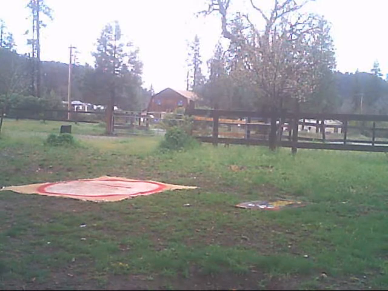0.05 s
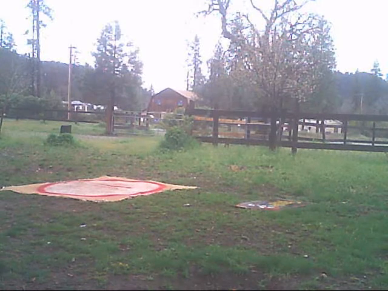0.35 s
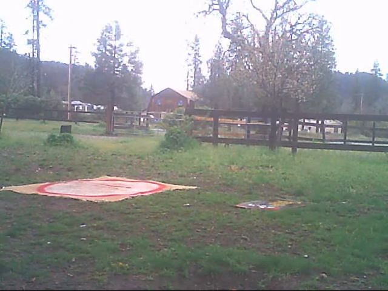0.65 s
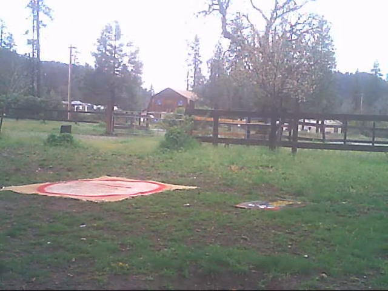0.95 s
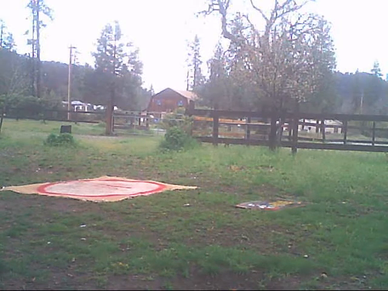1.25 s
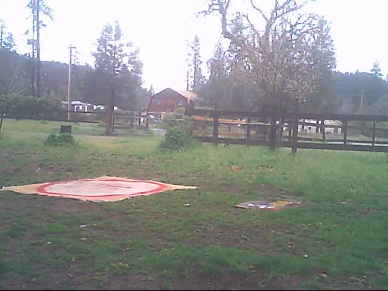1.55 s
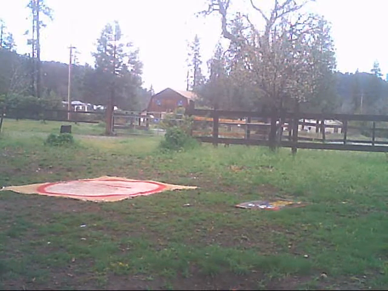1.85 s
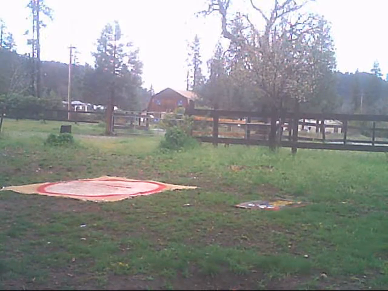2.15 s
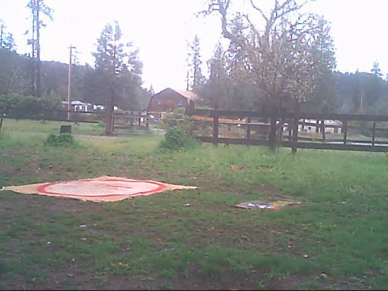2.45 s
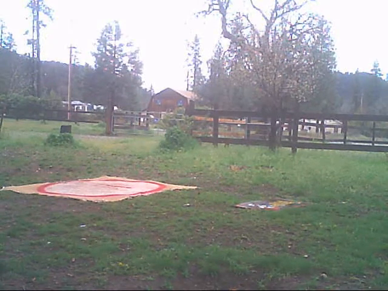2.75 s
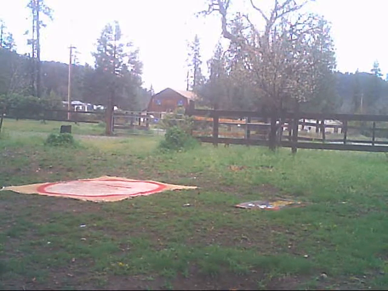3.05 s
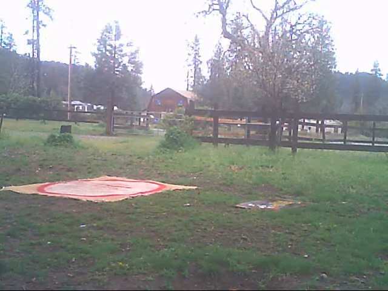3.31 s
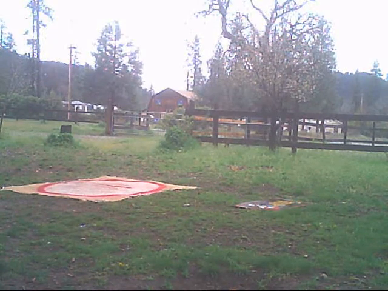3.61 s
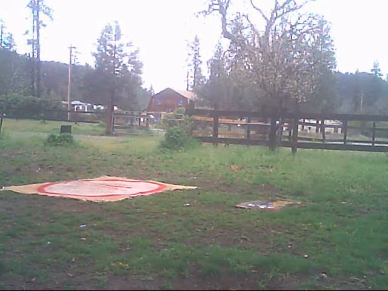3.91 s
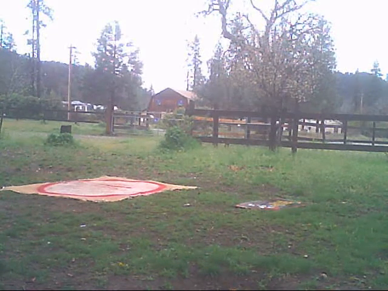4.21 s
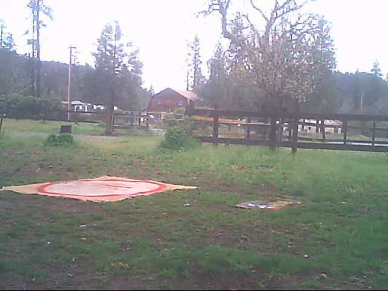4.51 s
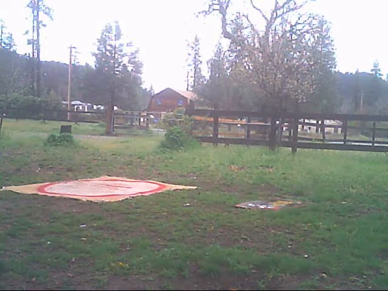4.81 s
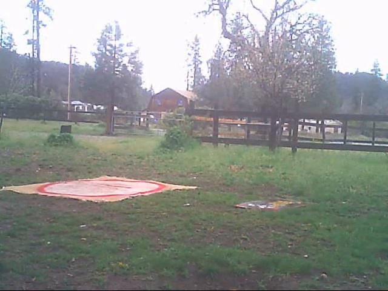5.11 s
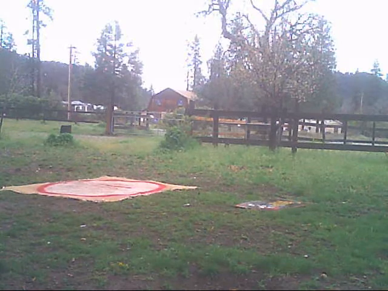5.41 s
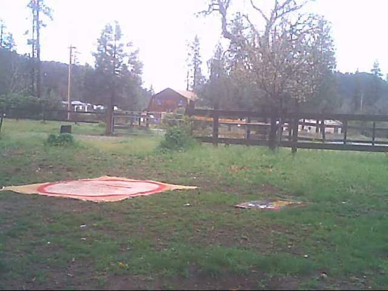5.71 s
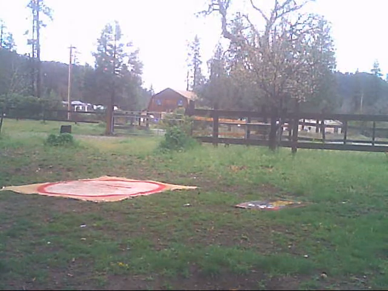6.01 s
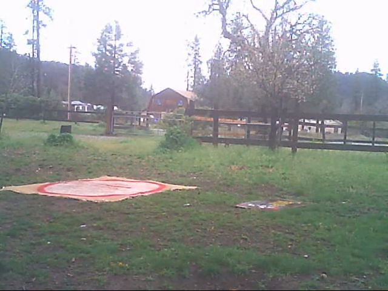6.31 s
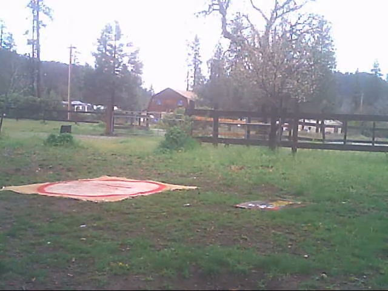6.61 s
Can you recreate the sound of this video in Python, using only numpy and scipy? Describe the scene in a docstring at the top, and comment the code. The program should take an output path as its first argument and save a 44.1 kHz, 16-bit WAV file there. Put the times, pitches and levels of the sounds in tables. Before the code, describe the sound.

The small engine of a model helicopter buzzes without a break outdoors, steady in speed and a little raspy. Its blades add a light flutter and a wash of air, and the engine stumbles slightly around two seconds in and again near five. The sound is mono and a bit fizzy, from a cheap microphone with some hiss and a light, low wind rumble.

```python
"""Model helicopter hovering over a field.

A small two-stroke glow engine holds a nearly steady speed. Running rich, it fires on every second
turn and now and then slips a beat; the main blades chop the exhaust note, throb and rush.
The tail rotor hums. Light wind bumps the microphone of a small camera with a coarse converter."""
import sys
import numpy as np
from scipy import signal
from scipy.fft import rfft, irfft, next_fast_len
from scipy.io import wavfile
from scipy.ndimage import map_coordinates

SR = 44100
rng = np.random.default_rng(int(sys.argv[2]) if len(sys.argv) > 2 else 0)


def unload_wav(signal):
    """Save mono or channel-first audio to the path in sys.argv[1] as 16-bit WAV at rate SR, clipped to [-1, 1]."""
    wavfile.write(
        sys.argv[1],
        SR,
        np.round(np.clip(np.atleast_2d(signal).T, -1, 1) * 32767).astype(np.int16),
    )


N = 293706

# camera hiss: freq_hz, density_db
HISS_SPECTRUM = [(100, 11), (3000, -1.5), (5000, -0.5), (8000, -3), (15000, -6)]
# camera whine: pitch_hz, level_db
WHINE_TONES = [(5669, -82), (8441, -69), (10002, -77), (14427, -83)]
# wind on the microphone: time_s, level_db
WIND_LEVEL = [(0.22, -42), (0.8, -57.5), (1.3, -52), (2.9, -48), (3.2, -57), (4.1, -56), (4.7, -45.5),
              (5.2, -55), (5.85, -46.5), (6.6, -53.5)]
# wind rumble: freq_hz, density_db
RUMBLE_SPECTRUM = [(5, -21), (20, 1), (60, -2), (125, -6.5), (170, -16.5), (400, -16), (1500, -86)]
# eddies on the microphone: time_s, level_db
WIND_BUMPS = [(2.183, -23), (4.667, -24.5), (4.686, -18.5)]
# main rotor load relative to hover: time_s, load_db
ROTOR_LOAD = [(0.3, 4.5), (0.75, 0.5), (1.7, 1), (2.15, 5.5), (2.8, 3.5), (3.3, 0.5), (4.0, -1.5),
              (4.6, -5.5), (5.35, -4.5), (5.8, -2.5), (6.5, -2.5)]
# air torn by the blades: freq_hz, density_db
WASH_SPECTRUM = [(100, -32), (200, -11), (350, -16), (550, -0.5), (880, 2.5), (1100, -4.5), (1600, -6.5),
                 (2100, -4.5), (2600, -9), (3300, -19), (6000, -32)]
# gas through the muffler's resonance: freq_hz, density_db
JET_SPECTRUM = [(200, -8), (500, 5.5), (1100, -10.5), (1450, 2), (1750, 4), (2000, -13), (2700, -6),
                (4000, -30)]
# crankshaft: time_s, speed_hz
CRANK_SPEED = [(0, 252.4), (0.2, 253), (0.5, 251.8), (0.9, 252.05), (1.27, 252.8), (1.63, 252.35),
               (2.03, 253.45), (2.35, 251.5), (2.64, 250.7), (2.96, 251.6), (3.42, 251.9), (3.82, 250.5),
               (4.28, 253.3), (4.62, 253.7), (4.88, 252.85), (5.65, 252.7), (6.07, 250.5), (6.42, 253.05),
               (6.66, 252.5)]
# firing slips to the other turn: start_s, end_s, slips_per_s
STUMBLES = [(0.906, 0.94, 33), (1.855, 2.45, 6.4), (4.371, 5.45, 12)]
# exhaust note behind the muffler: crank_order, level_db
EXHAUST_PARTIALS = [(.5, -57), (1, -43.5), (1.5, -53.5), (2, -42), (2.5, -49.5), (3, -51.5), (3.5, -48.5),
                    (4, -54.5), (4.5, -57), (5, -52), (5.5, -53), (6, -48.5), (6.5, -53), (7, -46.5),
                    (7.5, -59), (8, -57.5), (8.5, -57), (9, -59.5), (9.5, -66.5), (10, -61.5), (10.5, -73),
                    (11, -68), (11.5, -71), (12, -71), (13, -76), (14, -79), (15, -74)]
# tone near 250 Hz: time_s, level_db
LOW_TONE = [(0.1, 3), (1.9, -3), (2.8, 3.5), (3.45, 1.5), (3.85, 5.5), (4.25, 0), (5.3, -5), (6.3, 1)]
# drone near 500 and 760 Hz: time_s, level_db
OCTAVE_TONE = [(0.03, -1.5), (0.4, 4.5), (0.95, 3.5), (1.9, 0), (3.6, 1), (5.4, -2), (6.05, 0),
               (6.599, -2.8)]
# growl near 380 and 630 Hz: time_s, level_db
GROWL = [(0.5, -4), (1.6, 6), (3.0, -3), (3.9, 1.5), (4.9, -8.5), (6.5, 1.5)]
# nasal tone near 1.3 kHz: time_s, level_db
NASAL = [(0.12, 3), (0.9, -5.5), (1.8, -1), (2.55, 4.5), (3.0, -2.5), (3.45, 6), (4.0, -10), (4.6, 5),
         (5.3, 3.5), (6.0, -14)]
# buzz at 1 to 1.6 kHz: time_s, level_db
BUZZ = [(0.03, -7), (0.45, 2.5), (1.06, -8), (1.25, 0), (2.052, -0.5), (2.5, -8), (3.35, 9), (3.8, 1),
        (4.15, 3.5), (4.7, -0.5), (5.8, -1.5), (6.17, -10), (6.45, 1.5)]
# ring near 1.8 kHz: time_s, level_db
RING = [(0.05, 2), (1.08, -4), (1.23, 8.5), (1.5, -2), (2.0, 2.5), (2.55, -6.5), (3.22, 6.5), (3.47, -8),
        (3.72, 1.5), (4.05, -0.5), (4.25, 0.5), (4.98, 5), (5.72, -6), (6.1, 4.5), (6.3, -1.5)]
# partials with their own level curve: crank_orders, curve
LEAD_TONES = [((1,), LOW_TONE), ((2, 3), OCTAVE_TONE), ((1.5, 2.5), GROWL), ((5,), NASAL), ((4, 6, 6.5),
              BUZZ), ((7,), RING)]


def amp(db):
    """Decibels to gain."""
    return 10 ** (np.asarray(db) / 20)


def unit(x):
    """Scale to rms 1."""
    return x / np.sqrt(np.mean(x ** 2) + 1e-20)


def curve(rows):
    """(time_s, value) rows to one value per sample."""
    return np.interp(np.arange(N) / SR, *np.transpose(rows))


def wobble(rate_hz):
    """Smooth random curve, rate_hz knots a second."""
    coarse = np.arange(0, N + 64, 64)
    knots = rng.standard_normal(4096)
    return np.interp(np.arange(N), coarse, map_coordinates(knots, [coarse * rate_hz / SR], mode="wrap"))


def filtered(x, response):
    """Apply the gain response(hz)."""
    size = next_fast_len(N + 8192)
    return irfft(rfft(x, size) * response(np.fft.rfftfreq(size, 1 / SR)), size)[:N]


def noise(spectrum, gate=1):
    """Gated, coloured noise of rms 1."""
    freq_hz, db = np.transpose(spectrum)
    white = gate * rng.standard_normal(N)
    return unit(filtered(white, lambda hz: amp(np.interp(np.log(hz + 1), np.log(freq_hz), db))))


def electronics(hiss_db, whine_gain_db):
    """Camera hiss and thin, steady whine."""
    t = np.arange(N) / SR
    whine = sum(amp(db + whine_gain_db) * np.sin(2 * np.pi * hz * t) for hz, db in WHINE_TONES)
    return amp(hiss_db) * noise(HISS_SPECTRUM) + whine


def wind(gain_db, lumpy_db, bump_gain_db, bump_hz, bump_width_s):
    """Lumpy rumble; a few eddies push and pull the microphone membrane."""
    rumble = unit(amp(lumpy_db * wobble(22)) * noise(RUMBLE_SPECTRUM))
    out = amp(curve(WIND_LEVEL) + gain_db) * rumble
    for time_s, db in WIND_BUMPS:
        t = np.arange(N) / SR - time_s - bump_width_s / 2
        out += amp(db + bump_gain_db) * np.cos(2 * np.pi * bump_hz * t) / (1 + (t / bump_width_s) ** 2)
    return out


def tail_rotor(turns, load_db, first_db, second_db, flutter_rad, flutter_db):
    """Two small geared blades hum unsteadily, louder at low main rotor load."""
    passes = 1.071 * turns
    phase = 2 * np.pi * passes + flutter_rad * wobble(22)
    hum = amp(first_db) * np.sin(phase) + amp(second_db) * np.sin(2 * phase)
    return amp(-0.94 * load_db + flutter_db * wobble(8.9)) * hum


def main_rotor(blade_passes, level_db, waver_db):
    """Soft throb of the two main blades."""
    phase = 2 * np.pi * blade_passes
    return amp(level_db + waver_db * wobble(2.04)) * (np.sin(phase) + .5 * np.sin(2 * phase))


def blade_wash(blade_passes, load_db, level_db, swish_depth):
    """Torn air: grows with load, swells with each blade."""
    swish = np.exp(swish_depth * np.cos(2 * np.pi * blade_passes))
    return amp(level_db + load_db) * noise(WASH_SPECTRUM, swish)


def muffler_jet(cycles, level_db, waver_db, puff_depth):
    """Gas rushes through the muffler, swelling with each puff."""
    puffs = np.exp(puff_depth * np.cos(2 * np.pi * cycles))
    return amp(level_db + waver_db * wobble(2.83)) * noise(JET_SPECTRUM, puffs)


def firing_cycles(turns):
    """Two turns per cycle; in a stumble, each random slip advances it one turn."""
    t, slips = np.arange(N) / SR, np.zeros(N)
    for (start_s, end_s, slips_per_s), chance in zip(STUMBLES, rng.random((len(STUMBLES), 64))):
        slip_s = start_s + (np.arange(len(chance)) + chance) / slips_per_s
        slip_turns = np.round(np.interp(slip_s[slip_s < end_s], t, turns))
        slips += np.searchsorted(slip_turns, turns + 1 / 8)
    return (turns + slips) / 2


def puff_phases(levels_db):
    """Phases that gather the partials into a puff: sharp front, ringing tail."""
    log_gain = np.log(amp(np.concatenate([levels_db[:1], levels_db, levels_db[-2::-1]])))
    return -np.imag(signal.hilbert(log_gain))[1:len(levels_db) + 1]


def partial_swell_db(order, load_db, lead_sway_db, sway_db, sway_hz):
    """Lead tones follow their own curves, the high rasp the growl, the rest the load."""
    # short waves have narrow lobes: high partials vary most as the model sways
    sway = np.sqrt(order) * wobble(sway_hz)
    for orders, levels in LEAD_TONES:
        if order in orders:
            return curve(levels) + lead_sway_db * sway
    if order >= 7.5:  # rasp
        return 0.59 * curve(GROWL) - 0.2 + sway_db * sway
    return 0.52 * load_db + sway_db * sway


def exhaust(cycles, blade_passes, load_db, gain_db, tilt_db, drift_rad, uneven_db, jitter_turns, chop):
    """Uneven puffs as a stack of crank orders; firing every second turn gives the half orders."""
    orders, levels_db = np.transpose(EXHAUST_PARTIALS)
    per_turn = rng.standard_normal((2, 4096))
    strength, timing = [np.interp(2 * cycles, np.arange(4096), row) for row in per_turn]
    turns = 2 * cycles + jitter_turns * timing
    out = np.zeros(N)
    for order, level_db, phase in zip(orders, levels_db, puff_phases(levels_db)):
        swell_db = partial_swell_db(order, load_db, lead_sway_db=0.66, sway_db=1.28, sway_hz=6)
        # each passing blade shades and mirrors the muffler
        shade = 1 + chop * np.cos(2 * np.pi * (blade_passes + rng.random()))
        # muffler and shifting echoes smear the puff, high partials most
        smear_rad = drift_rad * np.sqrt(order) * wobble(2.007) - (order / 4) ** 2
        partial = np.cos(2 * np.pi * order * turns + phase + smear_rad)
        out += amp(level_db + tilt_db * order + swell_db) * shade * partial
    return np.sqrt(2) * amp(gain_db + uneven_db * strength) * out


def scene():
    """The crankshaft drives exhaust and both rotors, over wind and hiss."""
    turns = np.cumsum(curve(CRANK_SPEED)) / SR
    load_db = curve(ROTOR_LOAD)
    cycles = firing_cycles(turns)
    blade_passes = .2353 * turns
    engine = exhaust(cycles, blade_passes, load_db, gain_db=-0.62, tilt_db=-0.0455,
                     drift_rad=0.48, uneven_db=0.45, jitter_turns=0.0016, chop=0.14)
    wash = blade_wash(blade_passes, load_db, level_db=-48.5, swish_depth=0.055)
    jet = muffler_jet(cycles, level_db=-50.0, waver_db=0.5, puff_depth=0.12)
    hum = tail_rotor(turns, load_db, first_db=-60.5, second_db=-53.0, flutter_rad=0.72, flutter_db=5)
    throb = main_rotor(blade_passes, level_db=-52.0, waver_db=2.0)
    breeze = wind(gain_db=5.0, lumpy_db=2.0, bump_gain_db=-3.0, bump_hz=120, bump_width_s=0.0022)
    camera = electronics(hiss_db=-50.5, whine_gain_db=2.5)
    return (camera + breeze + hum + throb + wash + jet + engine)[None]


def converter(x, step, uneven):
    """Uneven steps: the wave lingers at some levels and hurries between them, adding fizz."""
    angle = 2 * np.pi * x / step
    return x + uneven * step / (2 * np.pi) * (np.sin(angle) - .5 * np.sin(2 * angle))


def record(dry):
    """Coarse camera converter with a band limit and a DC offset."""
    top_hz, dc_offset = 15440, -0.637
    coarse = converter(dry[0], step=0.036, uneven=0.49)
    return filtered(coarse, lambda hz: hz < top_hz)[None] + dc_offset


dry = scene()
out = record(dry)
unload_wav(out)
```